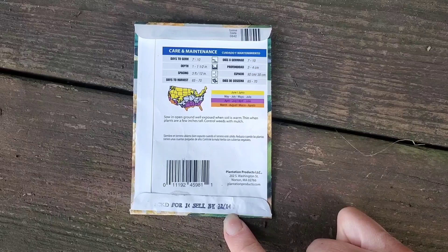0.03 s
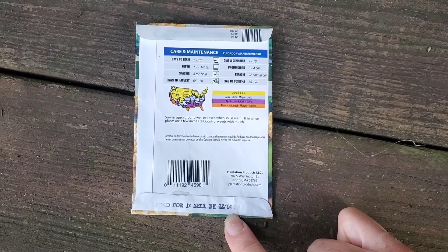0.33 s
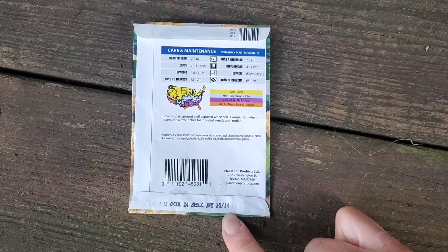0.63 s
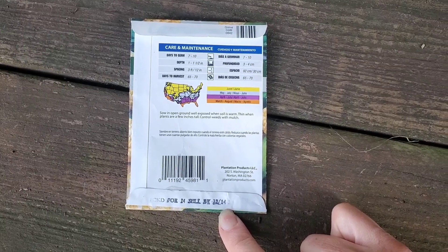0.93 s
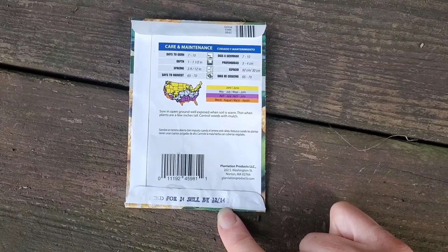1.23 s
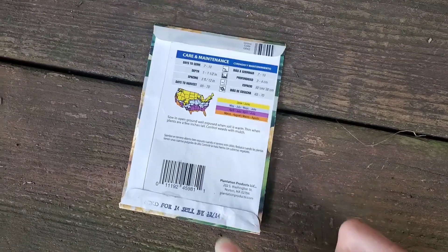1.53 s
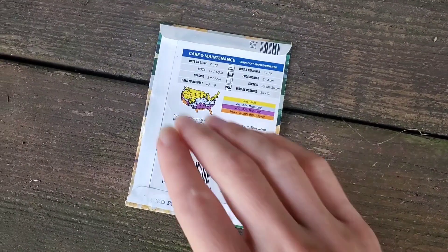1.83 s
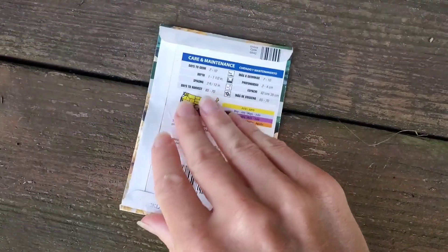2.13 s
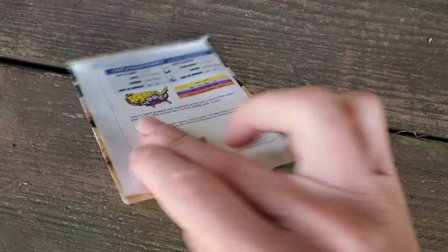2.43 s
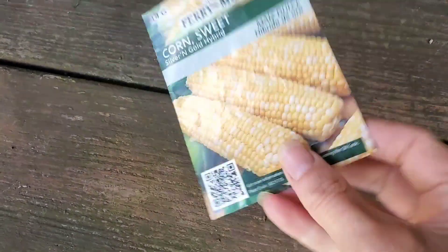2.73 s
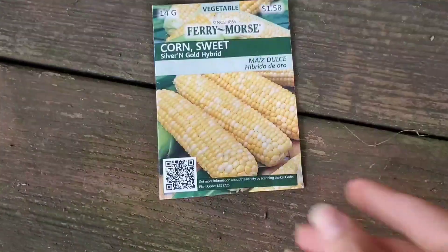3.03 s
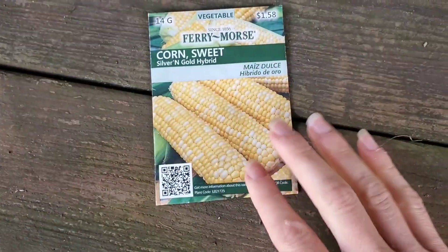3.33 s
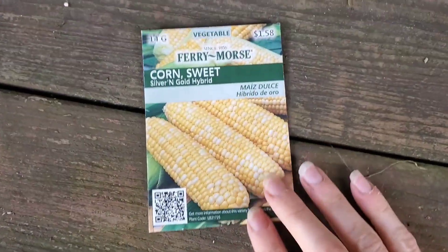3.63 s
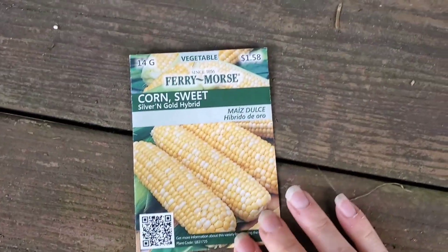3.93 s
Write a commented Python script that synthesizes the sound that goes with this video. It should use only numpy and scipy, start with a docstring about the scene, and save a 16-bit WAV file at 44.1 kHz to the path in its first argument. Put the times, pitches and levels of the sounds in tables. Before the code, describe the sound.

Close paper rustling and crisp snaps come from a seed packet turned over by hand, with a brief patter of seeds and light knocks on wood, then short scrapes as it settles. Faint songbirds and a low hum continue outdoors.

```python
"""Far songbirds over a low outdoor rumble and hum; a hand brushes and taps wooden deck boards.
A paper seed packet is nudged, picked up, flipped and laid down again, close and to the left.
The paper scrapes as its fibres catch and slip, and snaps as it buckles; seeds patter inside
as it turns over. Light knocks ring the boards; a nearby surface throws back a short echo."""
import sys
import numpy as np
from scipy import signal
from scipy.fft import rfft, irfft
from scipy.io import wavfile
from scipy.ndimage import uniform_filter1d

SR = 44100
rng = np.random.default_rng(int(sys.argv[2]) if len(sys.argv) > 2 else 0)


def int16_out(signal):
    """Quantize to a 16-bit WAV file."""
    q = np.round(np.clip(np.atleast_2d(signal).T, -1, 1) * 32767)
    wavfile.write(sys.argv[1], SR, q.astype(np.int16))


N = 176400
T, HZ = np.arange(N) / SR, np.fft.rfftfreq(N, 1 / SR)


def amp(db):
    """Decibels to gain."""
    return 10 ** (np.asarray(db) / 20)


def unit(x):
    """Scale to rms 1."""
    return x / np.sqrt(np.mean(x ** 2) + 1e-20)


def read(points, hz):
    """Interpolate on a log-frequency axis."""
    point_hz, value = np.transpose(points)
    return np.interp(np.log(hz + 1), np.log(point_hz + 1), value)


def level(points):
    """Gain from a level curve, silent outside it."""
    return amp(np.interp(T, *np.transpose(points), left=-200, right=-200))


def add(mix, start_s, sound):
    """Mix a sound in at start_s."""
    part = mix[:, round(start_s * SR):][:, :sound.shape[-1]]
    part += sound[..., :part.shape[-1]]


def colour(x, db):
    """Minimum-phase filter from a gain per bin."""
    log_gain = np.log(amp(np.r_[db, db[-2:0:-1]]))
    phase = -signal.hilbert(log_gain).imag[:len(db)]
    return irfft(rfft(x) * amp(db) * np.exp(1j * phase))


def drift(rate_hz):
    """Smooth random wander, rms 1."""
    return unit(irfft(rfft(rng.standard_normal(N)) * np.exp(-(HZ / rate_hz) ** 2)))


def treble(hz, corner_hz=7500):
    """Shelf: 0 below the corner, 1 above."""
    return 1 / (1 + (corner_hz / (hz + 1)) ** 6)


def reverb(x, envelope):
    """Scattered reflections, different per ear."""
    taps = rng.standard_normal((2, SR)) * envelope[:SR]
    return signal.fftconvolve(np.atleast_2d(x), taps / np.linalg.norm(taps[0]), axes=1)[:, :N]


def noise_bed(spectrum_db):
    """Partly coherent stereo noise, leaning left, rms 1."""
    # left-right likeness: freq_hz, coherence
    likeness = [(30, 0.93), (130, 0.94), (260, 0.74), (500, 0.35), (1000, 0.078), (2500, 0.075),
                (15000, 0.9)]
    # left over right: freq_hz, gain_db
    lean = [(60, 0.54), (180, 0.3), (550, 4), (1650, 4.4), (4970, 7), (15000, 0.59)]
    coherence = read(likeness, HZ)
    left, independent = rfft(rng.standard_normal((2, N)))
    right = coherence * left + np.sqrt(1 - coherence ** 2) * independent
    lean_db = np.outer([.5, -.5], read(lean, HZ))
    return unit(irfft(np.array([left, right]) * amp(spectrum_db + lean_db)))


def outdoors(hum_width_hz=11.7, flicker_db=1):
    """Low rumble, wavering machine hum, haze of far birds and insects."""
    # rumble and haze spectra: freq_hz, gain_db
    air = [(20, -28), (32, -23), (41, -23), (50, 3.5), (62, -3), (100, -1), (124, -11), (160, -13),
           (195, -15), (255, -15), (320, -22.5), (700, -25), (950, -29.5), (1500, -41)]
    chorus = [(900, 3), (1600, -9), (1950, -15), (2300, 12), (2800, 2.5), (3400, -9.5), (4500, -16),
              (5600, -21), (6600, -12), (7400, -24.5), (11000, -20.5), (15500, -16.5)]
    # distant machine partials: pitch_hz, level_db
    partials = [(76, -48), (229, -56.5), (354, -65.5), (451, -72)]
    # swell of rumble and hum: time_s, gain_db
    swell = [(0, 2.5), (.3, 1), (.55, -1), (1.2, 0), (1.8, 1.5), (3.3, 0.5), (4, -1.5)]
    rumble = amp(-41.5) * noise_bed(read(air, HZ) - 40 * treble(HZ, 3400))
    haze = amp(-65 + flicker_db * drift(13)) * noise_bed(read(chorus, HZ))
    hum = np.zeros(N)
    for hz, db in partials:
        phase = 2 * np.pi * hz * T
        hum += amp(db) * unit(drift(hum_width_hz) * np.cos(phase) + drift(hum_width_hz) * np.sin(phase))
    return (rumble + hum) * amp(np.interp(T, *np.transpose(swell))) + haze


def shuffle():
    """Skin of the resting hand brushes the wood."""
    # brushing: time_s, level_db
    brush = [(0, -56.5), (.14, -55.5), (.25, -63.5), (.42, -64), (.55, -94)]
    # its spectrum: freq_hz, gain_db
    spectrum = [(100, 18), (900, -21), (1700, 2.5), (3000, 2), (4800, -12), (7500, -26), (15000, -35)]
    return unit(colour(rng.standard_normal((2, N)), read(spectrum, HZ))) * level(brush)


def whistles(notes, waver, waver_hz, dry_db, wet_db, lean_db, t60_s=0.45):
    """Gliding bird notes of unsteady pitch, blurred by distance."""
    song = np.zeros((1, N))
    unsteady = 1 + waver * drift(waver_hz)
    for start_s, length_s, db, *pitches_hz in notes:
        progress = np.linspace(0, 1, int(length_s * SR))
        glide_hz = np.polyval(np.polyfit([0, .5, 1], pitches_hz, 2), progress)
        pitch_hz = glide_hz * np.roll(unsteady, -int(start_s * SR))[:len(progress)]
        envelope = amp(db) * np.sqrt(2) * np.sin(np.pi * progress)
        add(song, start_s, envelope * np.sin(2 * np.pi * np.cumsum(pitch_hz) / SR))
    heard = amp(dry_db) * song + amp(wet_db) * reverb(song, amp(-60 * T / t60_s))
    return heard * amp([[lean_db / 2], [-lean_db / 2]])


def twitter(centre_hz=2863, width_hz=410, flicker_db=2.5):
    """Distant twittering: a flickering band of noise."""
    # contour: time_s, level_db
    contour = [(1.2, -87), (1.6, -65), (1.8, -73.5), (1.98, -66.5), (2.2, -62), (2.78, -64), (3.0, -71),
               (3.23, -63), (3.45, -76.5), (4, -73)]
    band = np.exp(-((HZ - centre_hz) / width_hz) ** 2)
    noise = unit(irfft(rfft(rng.standard_normal((2, N))) * band))
    return noise * level(contour) * amp(flicker_db * drift(12) + [[2], [-2]])


def songbirds():
    """Slurred notes, thin buzzes, one repeated phrase and a twitter."""
    # calls: start_s, length_s, level_db, start_hz, middle_hz, end_hz
    slur_notes = [(0.023, 0.037, -55.5, 2570, 2770, 2910), (1.178, 0.045, -57.5, 2290, 2520, 2760),
                  (1.198, 0.099, -53.5, 2690, 2820, 2640), (1.375, 0.17, -57, 2270, 2340, 2300),
                  (1.412, 0.057, -51, 2294, 2540, 2780), (1.572, 0.067, -53.5, 2630, 2470, 2280),
                  (1.831, 0.046, -55.5, 2454, 2640, 2780), (1.962, 0.049, -54, 2935, 2600, 2500),
                  (2.207, 0.1, -58.5, 2226, 2404, 2530), (2.672, 0.073, -56.5, 2410, 2620, 2890),
                  (2.80, 0.046, -55.5, 2890, 2760, 2500), (3.072, 0.08, -56, 2380, 2690, 2940),
                  (3.225, .105, -66, 2900, 2560, 2110), (3.695, 0.11, -60, 2500, 2760, 2990),
                  (3.891, 0.068, -55.5, 2730, 2590, 2380)]
    buzz_notes = [(.05, 0.18, -73, 4460, 4590, 4350), (.24, 0.081, -76, 3850, 3960, 3770),
                  (.42, 0.086, -78.5, 4470, 4400, 4460), (.93, 0.35, -90, 8580, 8650, 8030),
                  (1.16, 0.12, -79, 3920, 3900, 3850), (1.33, 0.104, -78, 4500, 4630, 4580),
                  (1.485, 0.078, -70, 3940, 3880, 4030), (3.24, .24, -74, 4550, 4410, 4180)]
    # rise, downward break, chirp: offset_s, length_s, gain_db, start_hz, middle_hz, end_hz
    phrase = [(0, 0.047, -1, 2170, 2280, 2370), (0.04, 0.013, 4.5, 2350, 2430, 2410),
              (.056, .042, -0.5, 2360, 2116, 2050), (.163, 0.025, 1.5, 2653, 2770, 2830)]
    # phrase entries: start_s, level_db
    repeats = [(0.186, -54.5), (0.502, -52), (0.843, -53.5)]
    song_notes = [(start_s + offset_s, length_s, level_db + gain_db, *pitches_hz)
                  for start_s, level_db in repeats
                  for offset_s, length_s, gain_db, *pitches_hz in phrase]
    buzzes = whistles(buzz_notes, waver=.04, waver_hz=260, dry_db=-6, wet_db=-3, lean_db=12)
    slurs = whistles(slur_notes, waver=.016, waver_hz=160, dry_db=-4, wet_db=-4.5, lean_db=5)
    song = whistles(song_notes, waver=.017, waver_hz=138, dry_db=-5.5, wet_db=-3.5, lean_db=5)
    return slurs + buzzes + song + twitter()


def knocks():
    """Fingers and packet strike the boards, which ring briefly."""
    # blows: start_s, level_db
    blows = [(.026, -67), (2.117, -43), (2.13, -36.5), (2.4792, -41), (2.9015, -47)]
    # board modes: pitch_hz, gain_db, t60_s
    modes = [(232, -6.5, 0.037), (700, 0.5, 0.043), (943, -11, 0.036), (1204, -6, 0.045)]
    out, t = np.zeros((2, N)), T[:SR // 5]
    ring = sum(amp(db - 60 * t / t60_s) * np.sin(2 * np.pi * hz * t) for hz, db, t60_s in modes)
    for start_s, db in blows:
        add(out, start_s, amp(db) * ring)
    return out


def snaps(build_s=0.00066, flutter_s=0.0023, ring_db=9.5, ring_octaves=0.22, energy_s=0.0026):
    """Paper buckles: short build, sharp pulse, flutter, coloured by the panel that gives way."""
    # snaps and edge taps: start_s, level_db, ring_hz, bass_db, treble_db
    buckles = [(0.029, -52, 4500, -7, -27), (0.143, -50.5, 1660, 17, -36), (1.246, -61, 3360, -10, -18),
               (1.537, -60, 6500, 0, 14), (2.106, -52, 3350, -12, -6), (2.1151, -34.5, 3460, 7, -15),
               (2.119, -34.5, 4100, -17, -6), (2.130, -31.5, 3000, -4, -15), (2.1305, -33, 4550, -20, -5),
               (2.184, -48.5, 6460, -9, 42), (2.305, -52, 6000, -4, -7), (2.345, -45.5, 2570, 13, -16),
               (2.4806, -20, 3370, 5.5, -2.5), (2.4956, -29, 2370, -36, -24), (2.618, -47, 12800, -3, 1),
               (2.638, -35.5, 1840, 6.5, 3), (2.659, -38, 1820, 17, 25), (2.748, -48.5, 1430, 10, -31),
               (2.839, -44.5, 1800, 23, -36), (2.9012, -38, 1420, 14, -29), (2.981, -47.5, 1930, 17, -34),
               (3.133, -38, 6700, -26, -8.5), (3.14, -44, 3100, 8, -4), (3.148, -44, 6060, -19, -7),
               (3.164, -50, 6000, 0, -15), (3.571, -49.5, 3040, 4, -1), (3.771, -44.5, 7300, 10, 10),
               (3.7835, -44, 2200, 6, -12), (3.7864, -25.5, 2680, -0.5, -10.5),
               (3.789, -47, 6650, -33, -12), (3.8865, -53, 6330, -8, -1), (3.906, -30.5, 3130, -2, -10),
               (3.9061, -37, 6840, 0, -6), (3.9424, -46, 7140, 18, 5)]
    # common spectrum: freq_hz, gain_db
    spectrum = [(100, -14.5), (500, -25), (1100, -1), (3000, 0), (6800, -1.5), (8200, -4.5), (12000, -5.5),
                (16000, -17.5)]
    out, hz = np.zeros((2, N)), np.fft.rfftfreq(2048, 1 / SR)
    t = T[:2048] - T[256]
    envelope = np.exp(-abs(t) / np.where(t < 0, build_s, flutter_s))
    for start_s, db, ring_hz, bass_db, treble_db in buckles:
        push = .095 * rng.standard_normal((2, len(t))) * envelope
        push[:, t == 0] = 0.79  # the pulse
        panel_db = ring_db * np.exp(-.5 * (np.log2((hz + 1) / ring_hz) / ring_octaves) ** 2)
        shelves_db = bass_db * (1 - treble(hz, 1700)) + treble_db * treble(hz)
        snap = colour(push, read(spectrum, hz) + panel_db + shelves_db)
        snap /= np.linalg.norm(snap, axis=1, keepdims=True)
        add(out, start_s + t[0], amp(db) * np.sqrt(energy_s * SR) * snap)
    return out


def flexing(rub, depth_db=2.8):
    """The sheet's resonances shift as it bends, recolouring the rub in short patches."""
    frames = signal.stft(rub, nperseg=256, noverlap=192)[2]
    patches = rng.standard_normal(frames.shape[1:])
    for _ in range(2):
        patches = uniform_filter1d(patches, size=4, axis=0)
        patches = uniform_filter1d(patches, size=11, axis=1)
    frames *= amp(depth_db * unit(patches))
    return unit(signal.istft(frames, nperseg=256, noverlap=192)[1][:, :N])


def sliding(grains_per_s=4100, crinkles_per_s=170, crinkle_db=-11, hiss_gain=0.69, slip_db=2):
    """Fibres catch and slip in clumps of tiny clicks over a soft hiss; creases crinkle."""
    # paper on wood and skin, per move: time_s, level_db
    nudge = [(1.49, -86), (1.522, -73), (1.537, -47), (1.551, -54), (1.568, -52.5), (1.60, -66),
             (1.67, -80), (1.75, -76.5), (1.82, -96)]
    pick_up = [(2.102, -63), (2.125, -44.5), (2.16, -55.5), (2.195, -52), (2.255, -61), (2.285, -69),
               (2.34, -49), (2.375, -52)]
    flip = [(2.39, -47), (2.41, -47), (2.447, -39), (2.476, -33), (2.497, -36), (2.518, -48),
            (2.575, -46.5), (2.605, -56), (2.618, -48), (2.63, -73), (2.643, -47), (2.662, -51),
            (2.672, -81), (2.70, -69), (2.76, -60.5), (2.83, -73.5), (2.95, -75)]
    lay_down = [(2.95, -73), (2.978, -56), (3.015, -62.5), (3.073, -48.5), (3.12, -64.5), (3.146, -52),
                (3.19, -76), (3.26, -81)]
    straighten = [(3.56, -97), (3.576, -54), (3.62, -58), (3.661, -50.5), (3.70, -74), (3.73, -70),
                  (3.745, -59), (3.76, -69), (3.805, -58), (3.85, -93), (3.90, -69), (3.925, -66),
                  (3.99, -78)]
    # rub spectrum: freq_hz, gain_db
    spectrum = [(150, -16), (700, -1), (1500, -0.5), (3000, 2.5), (4500, 3), (6600, 3), (7800, -1),
                (10500, 1), (13000, -1), (15600, -1)]
    # treble shelf: time_s, gain_db
    brightness = [(1.55, 2), (1.75, 2), (2.15, -5), (2.29, -8), (2.34, 1.5), (2.38, -5), (2.41, 12.5),
                  (2.447, -8), (2.47, -3), (2.495, -11), (2.52, -6), (2.555, 2.5), (2.63, 8.5), (2.665, 7),
                  (2.71, 0), (3.07, 3), (3.65, -3.5), (3.81, -2), (3.95, 4)]
    catches = amp(-6 * np.minimum(rng.exponential(1, N), 4)) * (rng.random(N) < grains_per_s / SR)
    crinkles = rng.uniform(0.72, 1, N) * (rng.random(N) < crinkles_per_s / SR)
    sizes = unit(catches) + amp(crinkle_db) * unit(crinkles)
    grains = unit(sizes * (rng.choice([-1, 1], N) + .65 * rng.standard_normal((2, N))))
    hiss = hiss_gain * rng.standard_normal((2, N))
    rub = flexing(colour(grains + hiss, read(spectrum, HZ)))
    highs = irfft(rfft(rub) * treble(HZ))
    rub += highs * (amp(np.interp(T, *np.transpose(brightness))) - 1)
    motion = sum(level(move) for move in (nudge, pick_up + flip, lay_down, straighten))
    return rub * amp(slip_db * drift(110)) * motion


def handling(stereo_spread=0.58):
    """Low bumps and puffs of air as the hand turns the packet."""
    # bumps: time_s, level_db
    bumps = [(2.08, -78), (2.19, -40), (2.25, -44.5), (2.29, -36), (2.35, -38.5), (2.47, -41),
             (2.55, -37.5), (2.65, -40.5), (2.75, -45), (2.9, -55), (3.06, -45.5), (3.2, -63), (3.5, -46),
             (3.62, -60)]
    # their spectrum: freq_hz, gain_db
    spectrum = [(20, -23.5), (45, -2.5), (70, -3), (110, -0.5), (170, -23.5), (500, -26.5), (1500, -55.5)]
    puffs = rng.standard_normal(N) + stereo_spread * rng.standard_normal((2, N))
    return unit(colour(puffs, read(spectrum, HZ) - 60 * treble(HZ, 3200))) * level(bumps)


def seeds(hits_per_s=850):
    """Kernels patter against the pouch, each striking its modes differently."""
    # tumbling: time_s, level_db
    tumble = [(2.42, -81), (2.47, -70), (2.487, -41), (2.515, -64), (2.535, -49), (2.572, -45),
              (2.60, -54.5), (2.63, -60.5), (2.642, -42.5), (2.66, -47), (2.68, -85)]
    # pouch modes: pitch_hz, gain_db, t60_s
    modes = [(730, -1, 0.013), (1340, -3.5, 0.026), (1695, 2.5, 0.018), (1840, 3, 0.017),
             (2300, -13, 0.015), (2770, -10, .012), (3740, -16, 0.014)]
    rattle, t = np.zeros((2, N)), T[:SR // 10]
    hits = rng.random(N) < hits_per_s / SR
    for hz, db, t60_s in modes:
        strikes = hits * (rng.standard_normal(N) + .5 * rng.standard_normal((2, N)))
        ring = amp(db - 60 * t / t60_s) * np.sin(2 * np.pi * hz * t)
        rattle += signal.fftconvolve(strikes, ring[None], axes=1)[:, :N]
    return unit(rattle) * level(tumble)


def scene(echo_s=.013, echo_decay_s=0.0072, echo_db=-14, tail_db=-14.5, tail_t60_s=0.32):
    """Packet close and to the left, with a short echo, in open air."""
    # left over right: freq_hz, gain_db
    lean = [(200, 12), (700, 6), (1300, 7.5), (2400, 6.5), (4400, 7.5), (8000, 3), (15000, 7.5)]
    # right channel delay: freq_hz, lag_rad
    lag = [(100, 2.5), (700, -1.5), (1720, 1.9), (2840, -2.6), (4200, 5), (5500, 4), (6600, 6.5),
           (8000, 1.5), (15000, 7)]
    direct = snaps() + sliding() + seeds() + knocks() + shuffle()
    echo = reverb(direct, (T > echo_s) * np.exp(-abs(T - echo_s) / echo_decay_s))
    tail = reverb(direct, amp(-60 * T / tail_t60_s))
    packet = direct + amp(echo_db) * echo + amp(tail_db) * tail
    pan = amp(np.outer([.5, -.5], read(lean, HZ)))
    pan /= np.sqrt((pan ** 2).mean(0))
    delay = np.exp(-1j * np.outer([0, 1], read(lag, HZ)))
    return irfft(rfft(packet) * pan * delay) + handling() + songbirds() + outdoors()


def record(dry):
    """Low-pass at 16450 Hz."""
    taps = signal.firwin(401, 16450, window=("kaiser", 9), fs=SR)
    return signal.oaconvolve(dry, taps[None], "same")


dry = scene()
out = record(dry)
int16_out(out)
```